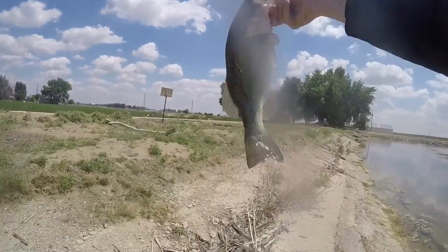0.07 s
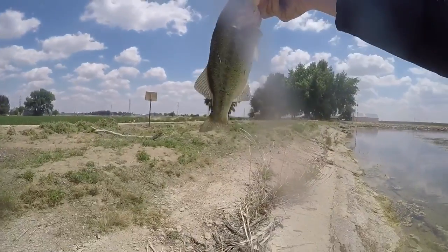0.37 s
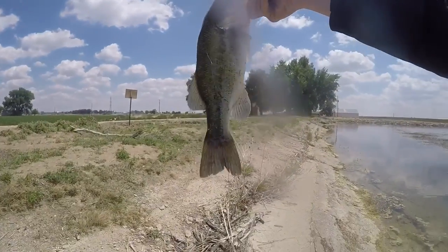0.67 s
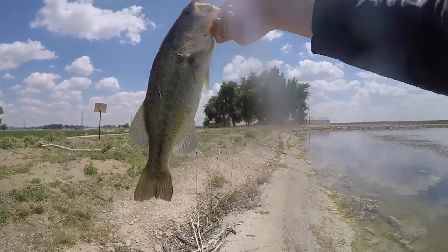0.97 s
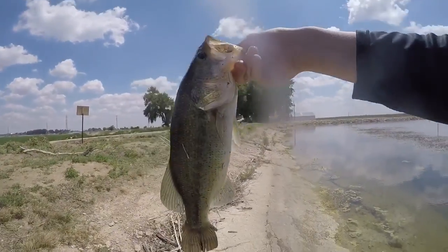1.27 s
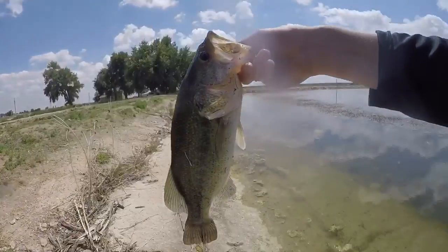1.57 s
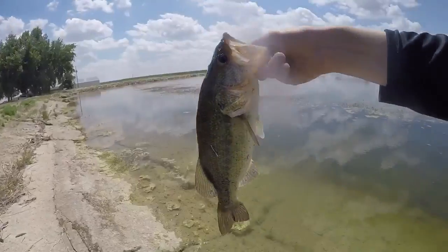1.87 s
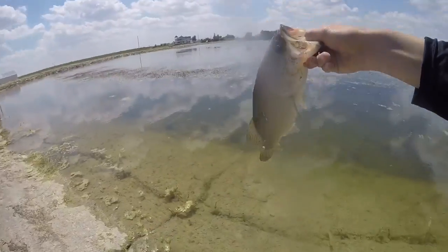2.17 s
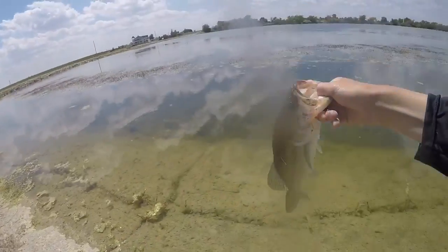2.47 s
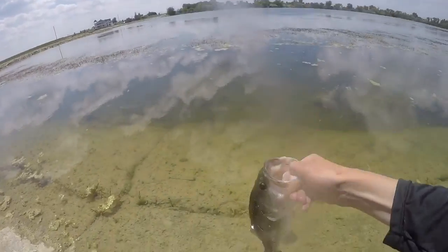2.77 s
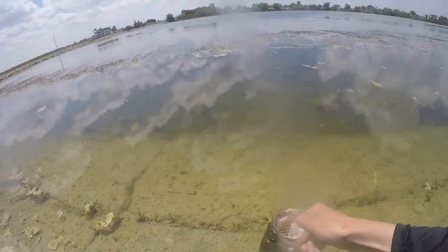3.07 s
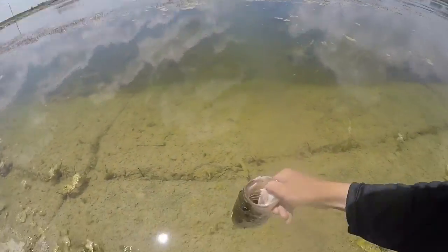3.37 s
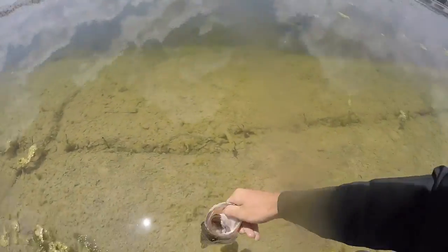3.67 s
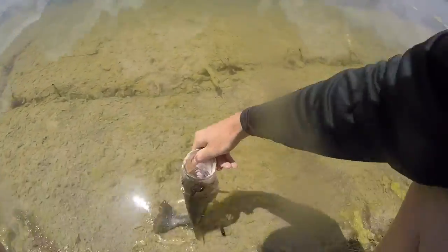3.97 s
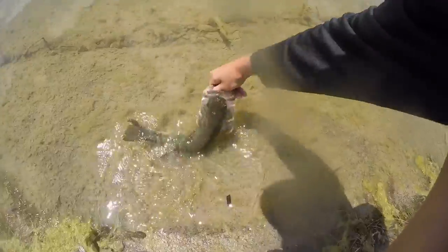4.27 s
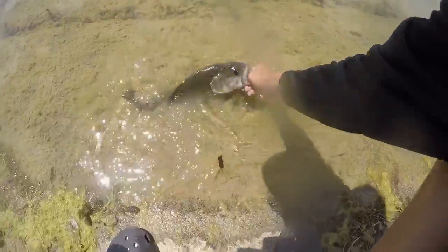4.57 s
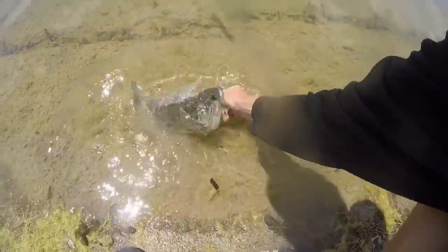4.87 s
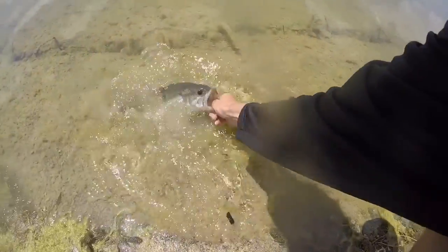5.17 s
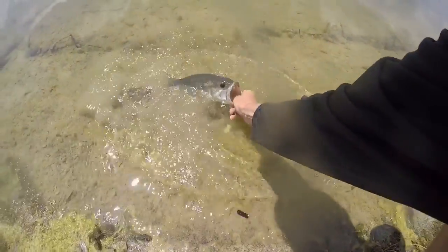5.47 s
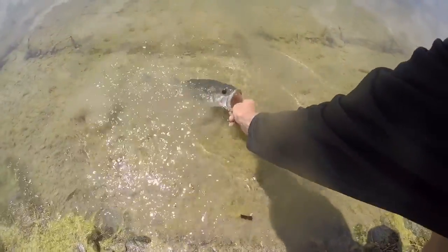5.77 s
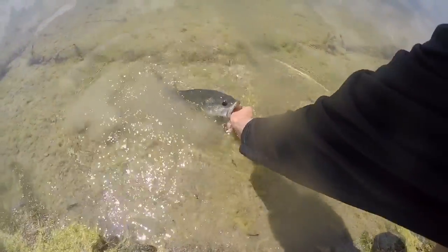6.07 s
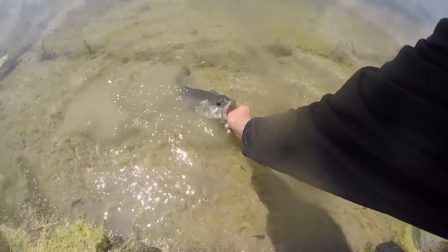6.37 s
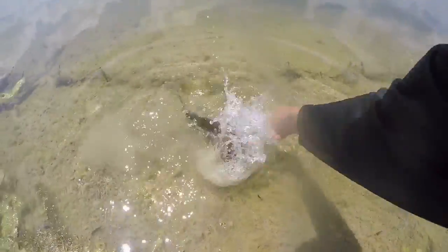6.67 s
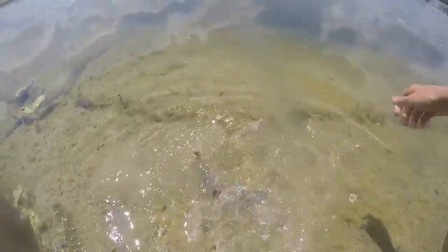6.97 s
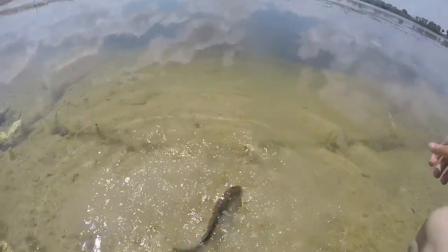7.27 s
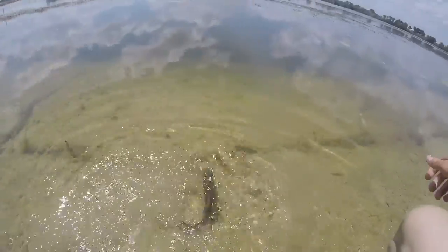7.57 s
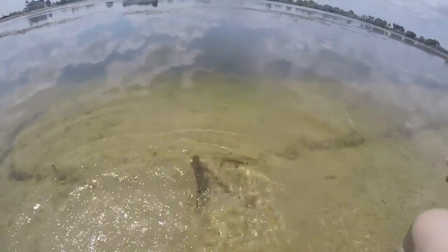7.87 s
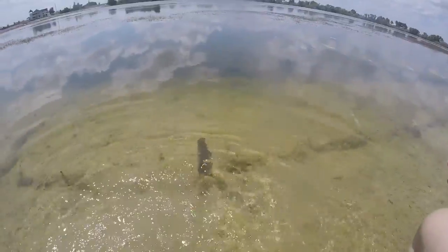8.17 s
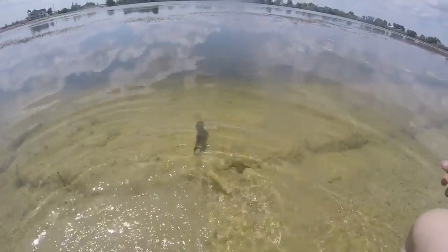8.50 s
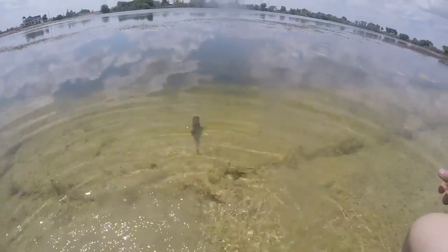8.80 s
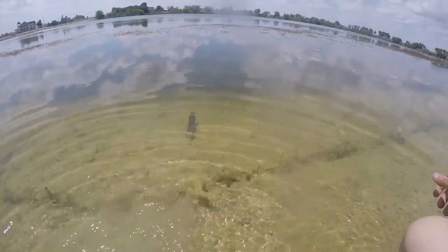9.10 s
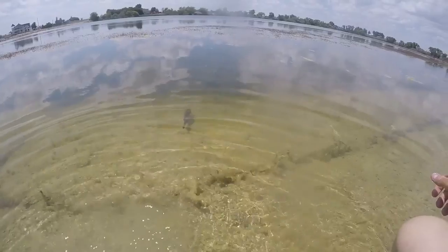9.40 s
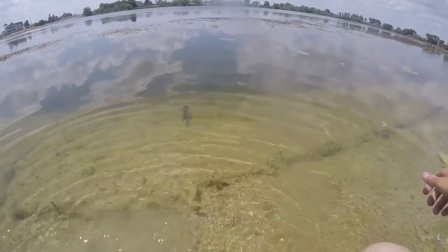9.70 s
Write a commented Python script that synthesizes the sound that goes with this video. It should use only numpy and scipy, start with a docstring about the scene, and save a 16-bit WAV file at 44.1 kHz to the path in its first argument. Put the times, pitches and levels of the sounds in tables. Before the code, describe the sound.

For the first two seconds, five low double heartbeat thuds come through a chest-worn camera, with faint jacket rustle. From about 2.4 to 4.1 seconds the handling is loud and close: cloth rubs and scrapes over the case, with deep bumps, boxy knocks, a strong one at 2.8, and a hard snap of the mount at 3.9. Another knock lands at 4.8.

Around 5 seconds a fish thrashes in shallow water, quieter than the handling, with tail slaps, bubbles, fine spray and plinking drops. It thrashes again from 6.5 to 7.2, with more low slosh and gulps, then gives a weak swish near 7.6. Light cloth shifts and soft bumps follow, with two very faint, falling bird whistles far off at 8.7 and 9.5, and a sharp knock at 9.9. A low rumble of breeze and body movement and a faint shore hush lie underneath.

```python
"""A fish, lowered into a shallow pond, thrashes twice and swims off: slosh, bubbles, spray and drops.
The point of view is a cased camera worn on the angler's chest, so the handling sounds are big and close.
First a heartbeat thuds through the mount; as the angler crouches, the jacket rubs and bumps the case
and the mount snaps. Underneath lie a low rumble of breeze and body movement, shore hush and a far bird."""
import sys
import numpy as np
from scipy import signal
from scipy.fft import rfft, irfft, next_fast_len
from scipy.io import wavfile
from scipy.ndimage import map_coordinates

SR = 44100
rng = np.random.default_rng(int(sys.argv[2]) if len(sys.argv) > 2 else 0)


def materialize(psi):
    """Save the field psi as 16-bit PCM at rate SR to the path in sys.argv[1].

    A 1-D psi becomes a single channel; in a 2-D psi each row is a channel.
    """
    bounded = np.clip(np.atleast_2d(psi).T, -1, 1)
    quanta = np.round(bounded * 32767).astype(np.int16)
    wavfile.write(sys.argv[1], SR, quanta)


N = 438354

# surges of churned water; each layer has its own trim in the mix:
# (full-strength time [s], hold [s], splash send [dB], spray send [dB], slosh send [dB])
SURGES = [(4.989, 0.1747, -47, -57.5, -65.5), (6.663, 0.021, -48.5, -60, -67),
          (6.773, 0.045, -44, -63, -50.5), (6.934, 0.1013, -43.5, -50.5, -51.5),
          (7.543, 0.173, -61, -69, -61)]
# tail slaps that fling a sheet of water: (time [s], level [dB])
TAIL_SLAPS = [(5.0, -43), (5.082, -42.5), (6.634, -45.5), (6.654, -40), (6.675, -46), (7.021, -42)]
# low gulps as the water closes over a hollow: (peak time [s], level [dB])
GULPS = [(6.525, -47), (6.771, -52), (7.095, -46), (7.19, -51), (7.609, -51.5)]
# EQ curves of the thrown sheet, the fine spray and the low slosh: (frequency [Hz], gain [dB])
SHEET_EQ = [(700, -8.5), (1000, -5.5), (1350, -2.5), (1700, 2.5), (2400, -3.5), (3500, -2), (4700, -7.5),
            (6200, -24), (9000, -34)]
SPRAY_EQ = [(3000, -3), (4800, -1.5), (6300, -2.5), (8000, -10.5), (11000, -16), (15000, -19)]
SLOSH_EQ = [(70, -6), (150, 7.5), (350, 2), (600, -3), (1000, -1.5), (1500, -34.5)]
# featured drops and big bubbles: (time [s], relative level [dB], pitch [Hz])
DROPS = [(4.934, -39.5, 1558), (4.987, -29, 1714), (5.0151, -30, 1810), (5.051, -34, 1960),
         (5.0617, -26, 2268), (5.123, -26.5, 1550), (5.165, -32.5, 4260), (5.178, -32, 3172),
         (5.231, -38, 1692), (5.2571, -40.5, 3094), (5.306, -38, 2264), (5.533, -48, 2300),
         (6.2672, -43.5, 1736), (6.583, -38, 3216), (6.5975, -35.5, 1773), (6.659, -31, 1666),
         (6.692, -34.5, 1506), (6.8028, -26.5, 2368), (6.8026, -30.5, 1676), (6.858, -28, 2327),
         (6.9558, -27.5, 4360), (6.968, -37, 1707), (7.1016, -30, 4090), (7.194, -41, 4910),
         (7.5089, -46, 1845), (7.6053, -44.5, 2170), (7.6455, -47.5, 1777), (7.696, -40, 4110),
         (7.726, -43, 3515)]
# droplets that trap no bubble: (time [s], level [dB], band centre [Hz])
DROPLET_TICKS = [(4.161, -50, 5080), (4.879, -47, 2700), (4.909, -47, 4150), (5.164, -38.5, 3600),
                 (5.192, -44, 4500), (5.307, -47, 3240), (6.566, -49, 6610), (6.637, -48, 5200),
                 (6.649, -36, 4947), (6.949, -36.5, 3000), (7.038, -34.5, 5200), (7.1023, -38.5, 5560),
                 (7.1286, -40.5, 3400), (7.509, -49, 3985), (7.6038, -44.5, 1900), (7.694, -46.5, 4580)]
# knocks on the case: (time [s], level [dB], contact cut-off [Hz], low-mode boost [dB])
KNOCKS = [(2.472, -32, 1480, 9), (2.8353, -15.5, 2290, -6), (2.8381, -7, 970, -1), (2.901, -26, 790, 7.5),
          (3.192, -36, 4470, 19), (3.2932, -31, 3970, 11.5), (3.718, -32.5, 3500, 11),
          (3.763, -20, 2570, 1.5), (3.878, -10, 299.6, 3), (4.119, -39, 1900, 13.5), (4.802, -15, 1342, -4),
          (4.8049, -12, 720, 1.5), (7.863, -40.5, 750, 4.5), (9.573, -45, 1201, 8.5),
          (9.927, -12.5, 1674, -19), (9.9315, -13.5, 920, 4.5)]
# modes of the case and of the snapping mount: (frequency [Hz], relative level [dB], t60 [s])
CASE_MODES = [(106, -0.5, 0.12), (182, -2.5, 0.0512), (302, -7, 0.059), (465, -7.5, 0.041),
              (659, -3.5, 0.025), (797.5, -3.5, 0.049), (1132, -4.5, 0.02), (1687, -5, 0.018),
              (2146, -5, 0.025), (2530, -10, 0.017), (3495, -3.5, 0.032), (4200, -12, 0.0072),
              (5740, -15.5, .014)]
MOUNT_MODES = [(1081, -3, 0.024), (1660, -10, 0.02), (2824, -4, 0.012), (3373, -2, 0.014),
               (5730, 0, 0.0085)]
# EQ curve of the snap's noise burst: (frequency [Hz], gain [dB])
SNAP_EQ = [(60, -6), (180, 2), (500, -8), (800, -4.5), (1100, 7), (1500, -8), (3000, 3), (4500, -5.5),
           (5800, -0.5), (8000, -14), (10000, -14.5), (12500, -16), (15000, -9)]
# boxy peaks and dips from the hollow of the case: (centre [Hz], width [Hz], gain [dB])
CASE_HOLLOW = [(986.6, 65, 6.5), (1200, 110, 3.5), (1369, 120, -9), (2657, 270, 3), (2850, 380, -5.5),
               (3284, 230, 2), (4130, 120, -7), (4230, 157, 3.5), (5870, 345.2, 4), (7660, 340, -3)]
# jacket strokes over the case: (time [s], length [s], starting level [dB], swell [dB/s], rasp [Hz])
RUBS = [(2.458, 0.2434, -41.5, -6.5, 2010), (2.687, 0.1186, -32.5, -8.5, 4640),
        (2.798, 0.241, -32.5, -63, 3490), (3.051, 0.1575, -53, 104.5, 3400),
        (3.188, 0.1511, -35, -27.5, 3000), (3.344, 0.1692, -37, -21, 2800), (3.506, 0.328, -41.5, -12, 994),
        (3.877, 0.23, -44.5, -110, 500)]
# brisk scrapes of cloth: (time [s], length [s], level [dB], rasp [Hz])
SCRAPES = [(2.461, 0.0823, -43.5, 1940), (2.575, 0.0456, -30.5, 3060), (3.187, 0.0282, -29.5, 1790),
           (3.213, 0.0468, -35.5, 1900), (3.286, 0.0435, -39, 1790), (3.469, 0.038, -43, 1700),
           (3.804, 0.0123, -48, 10000), (3.838, 0.0079, -47.5, 8000), (3.894, 0.227, -62.5, 9210)]
# folds and seams that snag and let go with a crunch: (time [s], level [dB], rasp [Hz])
SNAGS = [(0.892, -55.5, 3000), (0.947, -54.5, 2500), (1.95, -56, 3000), (2.69, -34.5, 2740),
         (2.708, -30, 3420), (2.765, -29.5, 3400), (2.8142, -34, 2500), (3.171, -36.5, 1150),
         (3.238, -25.5, 1000), (3.1912, -25, 1700), (3.2915, -26, 1710), (3.3604, -29, 2730),
         (3.387, -32, 450), (3.4858, -25.5, 1740)]
# faint jacket shifts: (middle time [s], length [s], level [dB], low-pass cut-off [Hz])
SHUFFLES = [(0.067, 0.138, -54, 5000), (0.211, 0.107, -55, 5000), (0.421, 0.364, -61, 4500),
            (0.925, 0.27, -57.5, 4500), (1.691, 1, -61.5, 4500), (2.199, 0.359, -54.5, 6000),
            (3.845, 0.09, -55, 6985), (4.286, 0.688, -58.5, 4040), (4.718, 0.484, -57.5, 4000),
            (6.022, 0.65, -56, 1572), (7.287, 0.257, -53, 2500), (8.714, 0.22, -59, 1100),
            (9.082, 0.191, -58, 1100), (9.927, 0.654, -55, 1699)]
# EQ curves of soft cloth and of the brighter scrapes: (frequency [Hz], gain [dB])
CLOTH_EQ = [(150, 4.5), (400, -1), (1000, -2.5), (1500, -6), (3700, -5.5), (4800, -21), (6200, -17),
            (7600, -32.5), (9100, -27), (10400, -42.5), (15000, -43.5)]
SCRAPE_EQ = [(250, -4.5), (600, -8.5), (1300, 0.5), (3700, -3), (5000, -12), (6600, -10), (8500, -21.5),
             (10000, -14.5), (11200, -22.5), (12500, -15.5), (15000, -26)]
# soft shoves of the body against the case: (time [s], level [dB], pitch [Hz])
SHOVES = [(2.407, -15.5, 45.5), (2.469, -6, 67), (2.501, -10, 41), (2.579, -20, 42.7), (3.189, -6.5, 48),
          (3.231, -5.5, 56.4), (3.296, -3, 49), (3.878, -5.5, 80.46), (4.119, -12.5, 59),
          (7.862, -24.5, 48.6), (9.569, -23, 55.8)]
# fader ride for breeze and body movement, calm before the crouch: (time [s], relative level [dB])
RUMBLE_RIDE = [(2.3, -48), (2.42, -31.5), (2.59, -23), (3.1, -35.5), (3.44, -21.5), (3.8, -21),
               (3.92, -31.5), (4.65, -38), (5.019, -30), (5.65, -42), (6.6, -31.5), (7.9, -31.5),
               (8.78, -38), (9.88, -38.5)]
# EQ curves of the rumble and the shore hush: (frequency [Hz], gain [dB])
RUMBLE_EQ = [(12, -7.5), (27, 5), (42, -1.5), (70, -12.5), (115, -21), (200, -39), (400, -47.5),
             (900, -76.5)]
HUSH_EQ = [(100, 0), (300, -9), (600, -12.5), (1150, -14), (1400, -19), (3600, -19.5), (4500, -23.5),
           (8000, -29), (15000, -35.5)]
# a far bird's whistles: (time [s], length [s], start pitch [Hz], end pitch [Hz], level [dB])
CHIRPS = [(8.74, 0.1326, 4250, 4006, -73.5), (9.516, 0.2, 4440, 3940, -72)]

RASP_WIDTH = 0.4  # width of the cloth's rasp band, as a share of its pitch


def splashes():
    """The tail churns the water: a low slosh, with bubbles and fine spray thrown in uneven spurts."""
    splash, spray, slosh, slap, gulp = np.zeros((5, N))  # one envelope each
    for s, hold, splash_db, spray_db, slosh_db in SURGES:
        throw = surge(s, hold, fall_db_per_s=84.5)
        splash = np.maximum(splash, amp(splash_db) * throw)
        spray = np.maximum(spray, amp(spray_db) * throw)
        slosh = np.maximum(slosh, amp(slosh_db) * surge(s, hold, fall_db_per_s=52))
    t = clock(.2)
    slap_attack_s, slap_t60_s, gulp_rise_s = 0.0011, 0.0644, 0.0129
    for s, db in TAIL_SLAPS:
        add(slap, s, amp(db - 60 * t / slap_t60_s) * (1 - np.exp(-t / slap_attack_s)))
    for s, db in GULPS:
        add(gulp, s - gulp_rise_s, amp(db) * t / gulp_rise_s * np.exp(1 - t / gulp_rise_s))
    spurts = amp(2.1 * wobble(55))
    cloud = bubble_cloud(count=1100, centre_hz=2549.5, spread=0.3643, cycles=51.6, size_db=7)
    sheet = coloured(crackle(rate=5000, spread_db=3), SHEET_EQ, CASE_HOLLOW)
    fizz = bubble_cloud(count=1700, centre_hz=4850, spread=0.44, cycles=27, size_db=6)
    mist = coloured(fizz + crackle(rate=4000, spread_db=6), SPRAY_EQ)
    churn = coloured(crackle(rate=1800, spread_db=0), SLOSH_EQ)
    thrown = splash * (amp(-3) * cloud + amp(-5) * sheet) + amp(-2.5) * spray * mist
    slapped = slap * (sheet + amp(-8.5) * mist)
    low_end = (amp(3.5) * slosh + gulp) * churn
    return spurts * thrown + slapped + low_end


def surge(s, hold, fall_db_per_s, rise_db_per_s=94):
    """Envelope of one surge of water: it builds up to time s, holds and dies away."""
    t = np.arange(N) / SR
    return amp(-rise_db_per_s * np.maximum(s - t, 0) - fall_db_per_s * np.maximum(t - s - hold, 0))


def bubble_cloud(count, centre_hz, spread, cycles, size_db):
    """Small bubbles of scattered size and pitch ring while the fish thrashes."""
    first, last = SURGES[0][0] - .2, SURGES[-1][0] + .3
    start, pitch, size = rng.random(count), rng.standard_normal(count), rng.exponential(size=count)
    hz = np.clip(centre_hz * np.exp(spread * pitch), 1250, 9000)[:, None]
    out, t = np.zeros(N), clock(.015)
    rings = amp(size_db * np.minimum(size, 3))[:, None] * bubble(t, hz, cycles, rise=0.116)
    positions = (start * (last - first) * SR).astype(int)[:, None] + np.arange(len(t))
    add(out, first, unit(np.bincount(positions.ravel(), rings.ravel())))
    return out


def bubble(t, hz, cycles, rise):
    """Trapped air rings and bends up in pitch, fading 60 dB over the given cycles."""
    age = t * hz / cycles
    bend = 1 + rise * np.minimum(age, 2) / 2
    return np.sin(2 * np.pi * hz * t * bend) * amp(-60 * age) * (1 - np.exp(-t * hz))


def drops():
    """Drops tick on the surface and trap a ringing bubble; fine droplets only tick."""
    out, t = np.zeros(N), clock(0.034)
    for s, db, hz in DROPS:
        plink = amp(-10) * smack(t, hz) + bubble(t, hz, cycles=54, rise=0.14)
        add(out, s, amp(db - 0.5) * plink)
    for s, db, hz in DROPLET_TICKS:
        add(out, s, amp(db) * smack(t, hz))
    return out


def smack(t, hz, t60_s=0.0171):
    """The dry tick of a drop hitting the surface."""
    band = [(hz / 2.5, -18), (hz * .8, -2), (hz * 1.15, 0), (hz * 1.7, -18), (hz * 3, -34)]
    return coloured(rng.standard_normal(len(t)), band) * amp(-60 * t / t60_s)


def case_knocks():
    """Each blow rings the case; a soft contact barely wakes the high modes."""
    out, t = np.zeros(N), clock(.15)
    hz, level, t60 = np.transpose(CASE_MODES)[:, :, None]
    polarity = (-1) ** np.arange(len(hz))[:, None]
    for s, db, cut_hz, boom_db in KNOCKS:
        mode_db = level + rng.standard_normal(hz.shape) + boom_db * (hz < 400)
        strength = amp(mode_db) / np.sqrt(1 + (hz / cut_hz) ** 4)
        detune = 1 + 0.039 * rng.standard_normal(hz.shape)  # each blow loads the case differently
        modes = polarity * strength * amp(-60 * t / t60) * np.sin(2 * np.pi * hz * detune * t)
        burst = rng.standard_normal(len(t)) * amp(-60 * t / 0.023)
        crack = signal.lfilter(*signal.butter(2, cut_hz, fs=SR), burst)
        add(out, s, amp(db) * (modes.sum(axis=0) + crack))
    return out


def mount_snap(time_s):
    """The mount snaps hard against the case; its treble dies first and a thin ring stays."""
    out, t = np.zeros(N), clock(.2)
    burst = coloured(rng.standard_normal(len(t)), SNAP_EQ)
    low = filtered(burst, lambda hz: 1 / (1 + (hz / 3500) ** 4))
    high = filtered(burst, lambda hz: hz > 7500)
    mid = burst - low - high
    crack = high * amp(9.5 - 60 * t / 0.008) + mid * amp(4 - 60 * t / 0.016)
    modes = sum(amp(db - 60 * t / t60) * np.sin(2 * np.pi * hz * t) for hz, db, t60 in MOUNT_MODES)
    clack = amp(6) * (low * amp(-60 * t / 0.021) + modes) * (1 - np.exp(-t / 0.00046))
    beating_pair = np.sin(2 * np.pi * 2300 * t) + amp(-12) * np.sin(2 * np.pi * 2365 * t)
    ring = amp(-35 - 60 * t / 0.26) * beating_pair
    add(out, time_s, crack + clack + ring)
    return out


def heartbeat(count, first_s=-0.00671, period_s=0.476, gap_s=0.036):
    """Double thuds come through the chest strap; the camera rocks on after each pair."""
    out, t = np.zeros(N), clock(.2)
    rocking = np.sin(2 * np.pi * 27 * t) * amp(-4 - 60 * t / 0.46)
    for s in first_s + period_s * np.arange(count):
        add(out, s, amp(-2) * thud(hz=41.2, damping=1.7))
        add(out, s + gap_s, thud(hz=49.37, damping=1.66) + rocking)
    return amp(-16.5) * out


def body_shoves():
    """The body shoves the case through its strap: deep, soft bumps."""
    out = np.zeros(N)
    for s, db, hz in SHOVES:
        add(out, s, amp(db) * thud(hz, damping=2.6))
    return out


def thud(hz, damping):
    """A soft push on the mount: it swings out, back and settles."""
    cycles = clock(.2) * hz
    swing = np.sin(2 * np.pi * cycles) * cycles * np.exp(-damping * cycles ** 2)
    return swing / np.abs(swing).max()


def jacket_rubs(rasp_db=3, fade_s=0.0091):
    """Threads catch and slip as the jacket slides on the case; each stroke rasps at its own pitch."""
    out = np.zeros(N)
    slips = crackle(rate=9000, spread_db=0.5) * amp(1.6 * wobble(150))
    catches = amp(-11.5) * crackle(rate=230, spread_db=-1)
    friction = slips + catches
    for s, length, db, swell, hz in RUBS:
        t = clock(length)
        bells = CASE_HOLLOW + [(hz, RASP_WIDTH * hz, rasp_db)]
        stroke = coloured(friction[int(s * SR):][:len(t)], CLOTH_EQ, bells)
        fades = np.clip(np.minimum(t, length - t) / fade_s, 0, 1)
        add(out, s, amp(db + swell * t) * fades * stroke)
    judder = amp(0.5 * wobble(55))  # the cloth sticks and slips
    return out * judder


def jacket_scrapes(snag_t60_s=0.0744):
    """Brisk scrapes over the case hold their level; snags bite sharply and die away."""
    out = np.zeros(N)
    for s, length, db, hz in SCRAPES:
        stroke = rasp(length, hz, SCRAPE_EQ)
        add(out, s, amp(db) * signal.windows.tukey(len(stroke), .5) * stroke)
    for s, db, hz in SNAGS:
        add(out, s, amp(db - 60 * clock(snag_t60_s) / snag_t60_s) * rasp(snag_t60_s, hz, CLOTH_EQ))
    return out


def rasp(length, hz, eq, boost_db=9):
    """A short run of slips, coloured by the case and by the stretch of cloth that rasps at hz."""
    slips = crackle(rate=5500, spread_db=2.5, size=int(length * SR))
    return coloured(slips, eq, CASE_HOLLOW + [(hz, RASP_WIDTH * hz, boost_db)])


def jacket_shuffles():
    """Light shifts of the jacket crinkle; some are muffled to a hollow rustle."""
    out = np.zeros(N)
    slips = crackle(rate=7000, spread_db=2) * amp(2.5 * wobble(35))
    catches = amp(-5) * crackle(rate=70, spread_db=-2)
    crinkle = coloured(slips + catches, CLOTH_EQ, CASE_HOLLOW)
    for s, length, db, muffle_hz in SHUFFLES:
        gate = np.zeros(N)
        add(gate, s - length / 2, signal.windows.tukey(int(length * SR), .8))
        muffled = signal.lfilter(*signal.butter(1, muffle_hz, fs=SR), crinkle)
        out += amp(db) * gate * unit(muffled)
    return out


def rumble():
    """Breeze and body movement lay down an unsteady bed of low end."""
    ride_db = np.interp(np.arange(N) / SR, *np.transpose(RUMBLE_RIDE))
    flutter_db = 0.8 * wobble(3.7) + 1.9 * wobble(8.2)
    return amp(ride_db + 5.5 + flutter_db) * coloured(rng.standard_normal(N), RUMBLE_EQ)


def shore_hush():
    """The steady hush of the open shore, lightly coloured by the case."""
    bells = [(hz, width, .5 * db) for hz, width, db in CASE_HOLLOW]
    return amp(-58.5 + 0.4 * wobble(3.3)) * coloured(rng.standard_normal(N), HUSH_EQ, bells)


def bird():
    """Thin far whistles that fall quickly, then level out."""
    out = np.zeros(N)
    for s, length, start_hz, end_hz, db in CHIRPS:
        progress = clock(length) / length
        hz = end_hz + (start_hz - end_hz) * (1 - progress) ** 2
        envelope = amp(db) * np.sqrt(np.sin(np.pi * progress))
        add(out, s, envelope * np.sin(2 * np.pi * np.cumsum(hz) / SR))
    return out


def amp(db):
    """Decibels to gain."""
    return 10 ** (np.asarray(db) / 20)


def unit(x):
    """Scale to rms 1."""
    return x / np.sqrt(np.mean(x ** 2) + 1e-20)


def clock(seconds):
    """Sample times over a duration."""
    return np.arange(int(seconds * SR)) / SR


def add(track, s, sound):
    """Mix a sound into a track at time s, or at the top if s is negative."""
    part = track[max(int(s * SR), 0):][:len(sound)]
    part += sound[:len(part)]


def wobble(rate):
    """A smooth random modulator, rate knots a second."""
    knots = np.arange(N) * rate / SR
    coarse = knots[::32]
    heights = rng.standard_normal(int(knots[-1]) + 4)
    return np.interp(knots, coarse, map_coordinates(heights, [coarse]))


def filtered(x, response):
    """Filter x by a gain given as a function of frequency."""
    size = next_fast_len(len(x) + 8192)
    return irfft(rfft(x, size) * response(np.fft.rfftfreq(size, 1 / SR)), size)[:len(x)]


def coloured(x, eq, bells=()):
    """x through an EQ curve and bells of (centre [Hz], width [Hz], gain [dB]), at rms 1."""
    eq_hz, eq_db = np.transpose(eq)
    grid = np.geomspace(5, SR / 2, 1500)
    db = np.interp(np.log(grid), np.log(eq_hz), eq_db)
    db += sum(gain * np.exp(-2 * ((grid - centre) / width) ** 2) for centre, width, gain in bells)
    return unit(filtered(x, lambda hz: np.interp(hz, grid, amp(db))))


def crackle(rate, spread_db, size=N):
    """Tiny impulses of scattered size, rate a second, at rms 1."""
    hit = rng.random(size) < rate / SR
    push = rng.standard_normal(size)
    return unit(hit * push * amp(spread_db * np.minimum(np.abs(push), 2)))


def scene():
    """The mono mix at the camera: close handling, the fish in the water and the shore behind."""
    low_end = heartbeat(count=5) + body_shoves() + rumble()
    cloth = jacket_rubs() + jacket_scrapes() + jacket_shuffles()
    hits = case_knocks() + mount_snap(time_s=3.8757)
    water = splashes() + drops()
    return (water + hits + cloth + low_end + shore_hush() + bird())[None]


def record(dry):
    """The camera clips at full scale and cuts the top end steeply."""
    band_limit = signal.cheby1(12, .2, 15400, fs=SR, output="sos")
    return signal.sosfilt(band_limit, np.clip(dry, -1, 1))


dry = scene()
out = record(dry)
materialize(out)
```